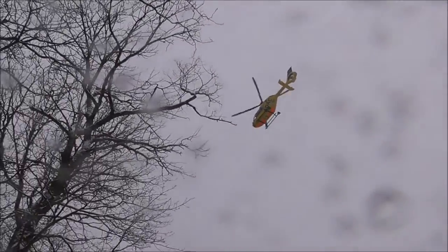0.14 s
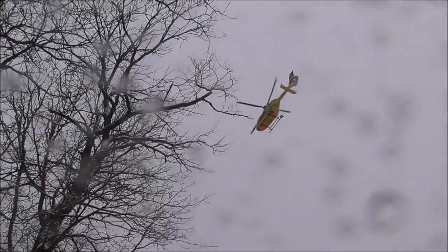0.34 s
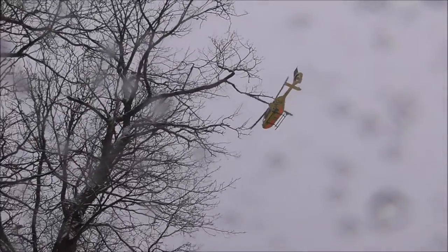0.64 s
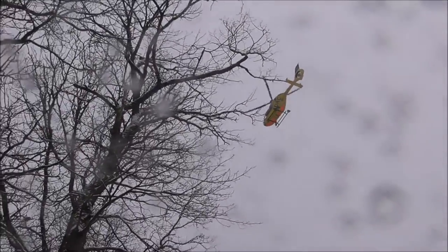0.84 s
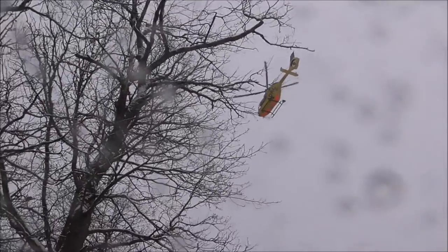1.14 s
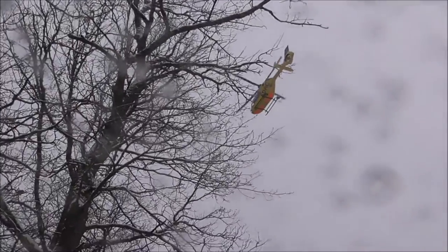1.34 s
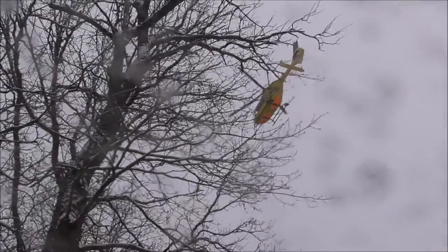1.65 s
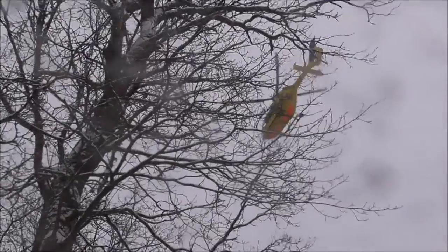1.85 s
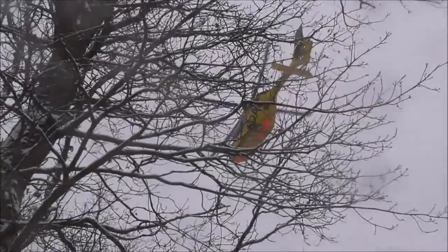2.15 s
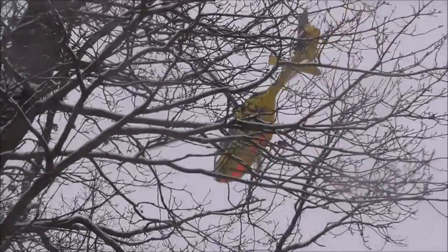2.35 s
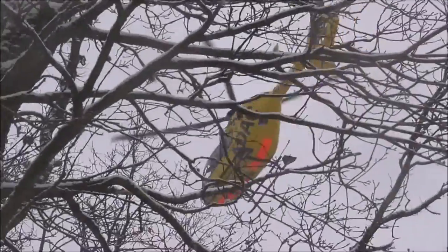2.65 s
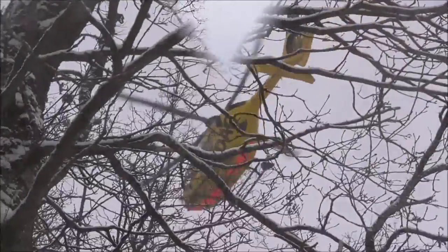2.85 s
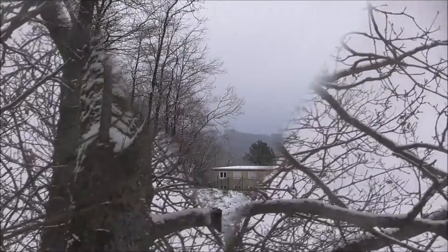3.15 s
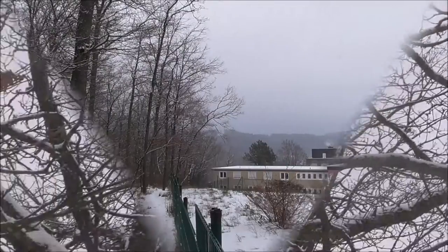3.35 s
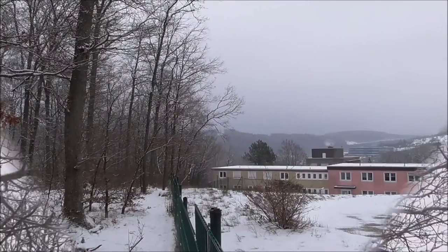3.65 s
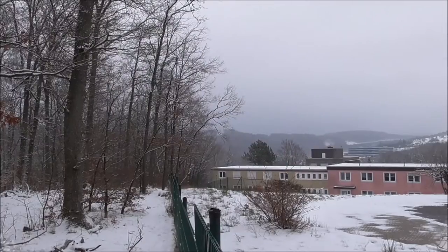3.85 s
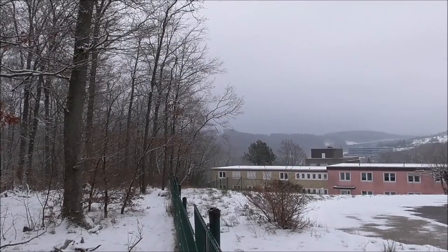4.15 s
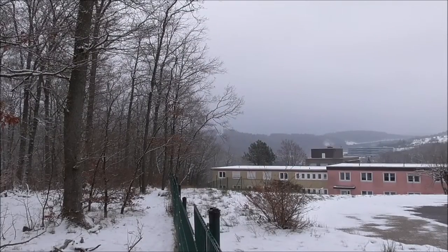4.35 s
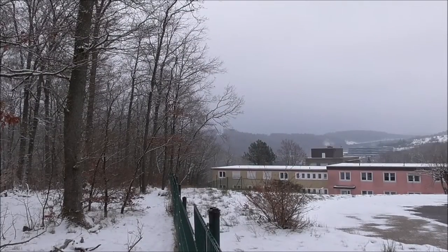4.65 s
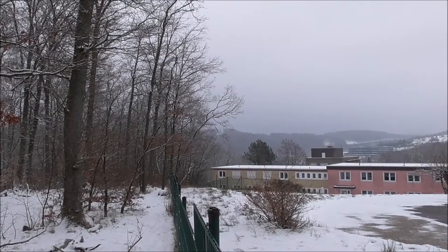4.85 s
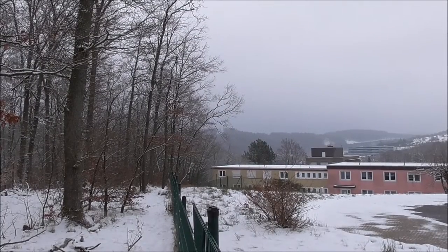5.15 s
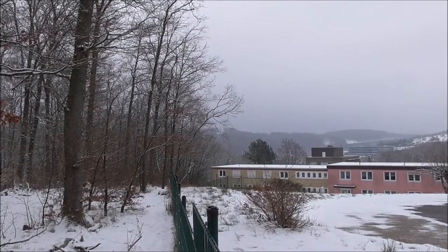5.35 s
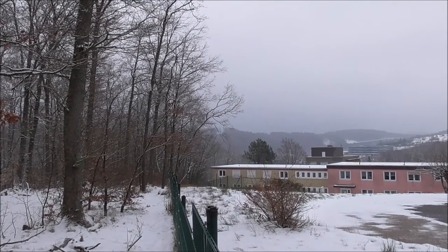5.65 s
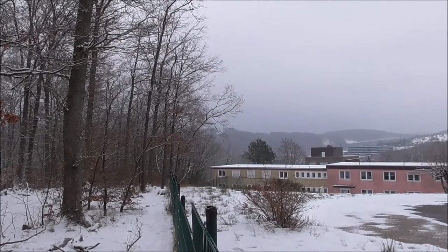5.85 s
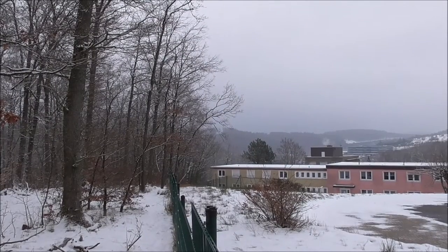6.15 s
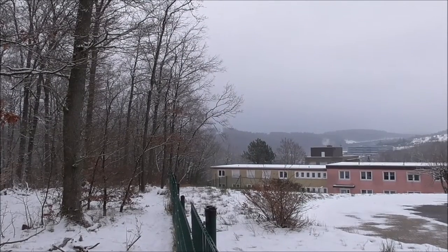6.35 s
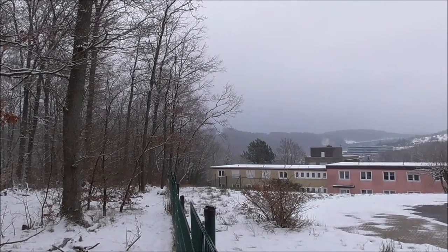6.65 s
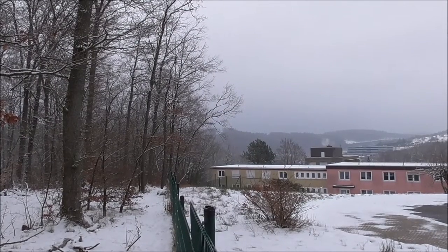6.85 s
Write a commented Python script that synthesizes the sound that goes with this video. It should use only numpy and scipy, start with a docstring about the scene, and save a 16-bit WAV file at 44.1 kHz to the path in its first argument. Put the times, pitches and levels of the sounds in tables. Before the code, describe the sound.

From the start a helicopter is heard outdoors, climbing closer with a broad roar of fast churning blades, low rumble and hissing exhaust. A tail fan hums, the gears sing one wavering note, and the turbines add a very high, flickering whine. The roar grows to its loudest overhead at about 3 seconds, with a rising sweep through the noise while the tones sink slightly. Wind gusts buffet the microphone lightly in the first second and harder from 3 to 4 seconds. At about 4.1 seconds everything cuts abruptly to a much quieter valley. A distant helicopter throbs and drones faintly, its hum drifting in and out over a thin hiss until the end at about 7 seconds. Nearby, snow slides very softly around 4.4 and 6.6 seconds, and tiny ticks of landing snow are scattered from 4.6 seconds, mostly after 6.

```python
"""First comes the roar of a helicopter climbing over a snowy field and passing overhead, in gusty wind.
Its blades churn the air, its exhaust hisses, its tail fan hums and its gears and turbines sing.
The echo off the ground comes ever sooner, which gives the roar a rising sweep.
After a hard cut a far helicopter throbs over a quiet valley, while snow slides and ticks nearby."""
import sys
import numpy as np
from scipy import signal
from scipy.fft import rfft, irfft, next_fast_len
from scipy.io import wavfile
from scipy.ndimage import uniform_filter1d, map_coordinates

SR = 44100
rng = np.random.default_rng(int(sys.argv[2]) if len(sys.argv) > 2 else 0)


def pcm_store(signal):
    """Save signal as 16-bit PCM."""
    levels = np.round(np.clip(np.atleast_2d(signal), -1, 1) * 32767)
    wavfile.write(sys.argv[1], SR, levels.astype(np.int16).T)


N = 309141
TIME = np.arange(N) / SR
CUT_S = 4.089


def amp(db):
    return 10 ** (np.asarray(db) / 20)


def unit(x):
    return x / np.sqrt(np.mean(x ** 2) + 1e-20)


def along(points, hz):
    """Join (frequency, value) points on a log frequency axis."""
    f, v = np.transpose(points)
    return np.interp(np.log(hz + 1), np.log(f + 1), v)


def curves(rows):
    """One value per sample for each column after the time."""
    s, *cols = np.transpose(rows)
    return [np.interp(TIME, s, c) for c in cols]


def wobble(rate):
    """A smooth random curve through rate points a second."""
    return map_coordinates(rng.standard_normal(int(N * rate / SR) + 4), [np.arange(N) * rate / SR])


def swell(s, half_s):
    """A smooth rise to 1 at time s, and its fall."""
    return np.exp(-((TIME - s) / half_s) ** 2)


def flares(rows, half_s):
    """Extra dB of a tone that flares up now and then."""
    return sum(db * swell(s, half_s) for s, db in rows)


def filtered(x, response):
    """Scale each frequency in x by response(hz)."""
    m = next_fast_len(N + SR // 2)
    return irfft(rfft(x, m) * response(np.fft.rfftfreq(m, 1 / SR)), m)[..., :N]


def rush(colour, width):
    """Stereo noise: colour shapes its spectrum, width sets how much left and right differ."""
    mid, side = filtered(rng.standard_normal((2, N)), lambda hz: amp(along(colour, hz)))
    side = filtered(side, lambda hz: amp(along(width, hz)))
    return unit(np.array([mid + side, mid - side]))


def tone(cycles, blur, rate):
    """A sine whose level and phase flutter in moving air."""
    flutter = 1 + blur * (wobble(rate) + 1j * wobble(rate))
    return unit(np.real(flutter * np.exp(2j * np.pi * cycles)))


def chop(blades, depth_db, scatter_db):
    """A swell each time a blade goes by, each of its own strength."""
    strength = map_coordinates(rng.standard_normal(1024), [blades], order=1)
    return unit(amp(depth_db * np.cos(2 * np.pi * blades) + scatter_db * strength))


def shimmer(x, patchy_db):
    """Swirling air briefly lifts or thins narrow bands of pitch."""
    spectra = signal.stft(x, nperseg=1024)[2]
    patches = uniform_filter1d(rng.standard_normal(spectra.shape[1:]), size=4, axis=0)
    patches = uniform_filter1d(patches, size=16, axis=1)
    return unit(signal.istft(spectra * amp(patchy_db * unit(patches)), nperseg=1024)[1][:, :N])


def passing(overhead_db, falloff, aft_db):
    """Level in dB of a source flying past: it loses falloff dB per dB of distance, gains aft_db behind."""
    overhead_s, pass_s = 2.89, 0.79  # when it is closest; time to fly as far as that distance
    speed_up_per_s = 0.26
    past = np.expm1(speed_up_per_s * (TIME - overhead_s)) / (speed_up_per_s * pass_s)
    distance = np.hypot(1, past)
    return overhead_db - falloff * 20 * np.log10(distance) + aft_db * past / distance


# gusts of rough air: t/s, half length/s, rumble level/dB, buffet level/dB
GUSTS = [(0.058, 0.063, -27, -75), (0.206, 0.025, -19, -45), (0.34, 0.11, -18, -36.5),
         (0.566, 0.21, -24, -41.5), (0.84, .04, -24.5, -46), (1.106, 0.083, -40, -61),
         (1.46, 0.063, -40, -51.5), (1.78, 0.11, -30.5, -44), (2.194, 0.034, -54, -49),
         (2.903, 0.035, -21.5, -39.5), (3.037, 0.13, -25, -31), (3.145, 0.038, -16.5, -19.5),
         (3.25, 0.095, -28.5, -29.5), (3.505, 0.081, -28, -29), (3.672, 0.031, -42, -38.5),
         (3.838, 0.15, -43, -26.5), (4.008, 0.15, -38, -25.5)]
def gusts():
    """Gusts add their power to a calm base of blade rumble and wind buffeting."""
    rumble, buffet = sum(np.outer(amp(levels), swell(s, half_s)) ** 2 for s, half_s, *levels in GUSTS)
    calm_rumble = amp(passing(-39, falloff=-1.22, aft_db=0))  # leaves the rotor edge-on: weakest overhead
    breeze = amp(-75.5)
    return np.sqrt(rumble + calm_rumble ** 2), np.sqrt(buffet + breeze ** 2)


# stereo width of the near helicopter: f/Hz, side minus mid/dB
NEAR_WIDTH = [(100, -57), (600, -69), (1200, -58), (2500, -30), (4700, -18), (6500, -28), (8300, -12.5),
              (10000, -18), (13000, -29)]
# spectrum of the rumble: f/Hz, level/dB
RUMBLE_COLOUR = [(15, -50.5), (32, -32), (50, -10.5), (80, -2), (120, 1), (170, 5), (250, 4.5), (380, -4.5),
                 (800, -60), (4000, -100)]
def blade_rumble(blades):
    """The blades hit rough air and make a lumpy rumble."""
    return gusts()[0] * chop(blades, depth_db=2.5, scatter_db=-0.7) * rush(RUMBLE_COLOUR, NEAR_WIDTH)


# surges in the roar: t/s, half length/s, wash gain/dB, exhaust gain/dB, hiss gain/dB
SURGES = [(0.085, 0.043, -4, 1.5, 3.5), (0.2, 0.072, 1.5, 3, 4), (0.497, 0.06, 3, 2.5, 1),
          (0.647, 0.052, 0, 0.5, 5.5), (0.86, 0.1, 2.5, 0, -0.5), (1.2, 0.3, -0.1, 2.5, -0.5),
          (1.697, 0.15, 1.5, 0.5, 0), (1.91, 0.035, 2, 3.5, -1.5), (2.12, 0.026, 1, 2.5, 0),
          (2.304, 0.18, 2, .5, 0.5), (2.556, 0.083, 1, 2.5, -0.5), (2.68, 0.055, 2, 3.5, 4),
          (2.88, .05, 1.2, 2.5, 5), (2.98, 0.031, 1.5, 4, -3.5), (3.24, 0.17, -2.5, 0.4, 1.5),
          (3.58, 0.31, 1.4, 2, -2)]
def surges():
    """The air focuses or thins the roar: extra dB of wash, exhaust and hiss."""
    return sum(np.outer(gains_db, swell(s, half_s)) for s, half_s, *gains_db in SURGES)


# spectra of the wash and the hiss: f/Hz, level/dB
WASH_COLOUR = [(60, -61.5), (150, -14), (270, 0.2), (340, -1), (440, -0.5), (540, -1), (720, 1.5),
               (950, -2), (1200, -7.5), (1450, -9.5), (1700, -19.5), (2600, -36.5), (6000, -71)]
HISS_COLOUR = [(1500, -28), (3300, 2), (5400, -2.5), (6800, 2.5), (8200, 2.5), (9400, -3), (11500, -3.5),
               (13000, -6.5), (13700, -20), (14300, -22.5), (15000, -32)]
def rotor_wash(blades, wash_db, hiss_db):
    """The blades churn the air into a broad whoosh, the wash, and their edges hiss."""
    wash = amp(passing(-15, falloff=0.93, aft_db=-0.8) + wash_db)
    wash = wash * chop(blades, depth_db=0.27, scatter_db=0.52)
    wash = wash * shimmer(rush(WASH_COLOUR, NEAR_WIDTH), patchy_db=0.98)
    hiss = amp(passing(-35, falloff=0.91, aft_db=-5) + hiss_db)
    hiss = hiss * chop(blades, depth_db=1.4, scatter_db=0.75)
    hiss = hiss * shimmer(rush(HISS_COLOUR, NEAR_WIDTH), patchy_db=2.2)
    return wash + hiss


# spectrum of the exhaust: f/Hz, level/dB
EXHAUST_COLOUR = [(500, -25), (1100, 9), (1750, -0.5), (2050, 1.5), (2400, -4), (2700, -2.5), (3050, -5),
                  (3450, -3.5), (3950, -5), (4500, -6.5), (5400, -12), (7000, -12), (10000, -25.5),
                  (14000, -61)]
def exhaust(surge_db):
    """The turbines' jet noise, strongest about overhead."""
    jet = shimmer(rush(EXHAUST_COLOUR, NEAR_WIDTH), patchy_db=1.5)
    return amp(passing(-20, falloff=1.8, aft_db=-1.4) + surge_db + .4 * wobble(24.9)) * jet


# how late the ground echo comes: t/s, lag/ms
ECHO_LAG = [(0, 8.24), (1, 7.9), (2, 6.86), (3, 6.06), (4.1, 4.96)]
def ground_echo(x, echo_db, dull_hz):
    """The snow returns a duller copy that weakens some pitches; they rise as its lag shrinks."""
    n = np.arange(N)
    lag = curves(ECHO_LAG)[0] * SR / 1000
    bounce = amp(echo_db) * filtered(x, lambda hz: 1 / (1 + (hz / dull_hz) ** 2))
    return x + np.array([np.interp(n - lag, n, channel) for channel in bounce])


# the whistle comes through more strongly: t/s, gain/dB
WHISTLE_FLARES = [(.08, 11), (.52, 12), (.85, 4), (1.8, 4), (2.65, 3), (2.87, 6.5), (3.15, 3), (3.59, 9)]
def blade_whistle(blades, craft_time, centre_hz=13200, sweep_hz=2786, wander_hz=170):
    """Each advancing blade gives a short, airy whistle that falls in pitch as it swings past."""
    swing = blades % 1 - .5
    cycles = centre_hz * craft_time + np.cumsum(wander_hz * wobble(30) - sweep_hz * swing) / SR
    bursts = unit(np.exp(-(swing / 0.15) ** 2)) * chop(blades, depth_db=3, scatter_db=1.0)
    level_db = passing(-55.5, falloff=1.4, aft_db=-9) + flares(WHISTLE_FLARES, half_s=0.064)
    return amp(level_db) * bursts * tone(cycles, blur=2.5, rate=710)


# notes of the fan's hum: multiple of the hum's lowest note, level/dB, gain behind/dB
FAN_NOTES = [(1, -13, -6.5), (2, -4, 5.5), (3, -3, 4.5), (4, 2, -2), (5, -4, -1), (6, -12.5, -0.5),
             (7, 2.5, 0.5)]
def tail_fan(craft_time, hum_hz=119.7):
    """Unevenly spaced fan blades hum a stack of notes, each beamed its own way."""
    return sum(amp(passing(db - 31.5, falloff=1.08, aft_db=aft_db))
               * tone(k * hum_hz * craft_time, blur=0.35, rate=13) for k, db, aft_db in FAN_NOTES)


# the gearbox note rings out: t/s, gain/dB
GEAR_FLARES = [(1.2, 2), (1.95, 6.5), (2.9, 8.5), (3.7, 3.5), (3.95, 5.5)]
def gearbox(craft_time, hz=813.5):
    """The gears sing one wavering note."""
    level_db = passing(-28.5, falloff=0.94, aft_db=1.5) + flares(GEAR_FLARES, half_s=0.13)
    return amp(level_db) * tone(hz * craft_time + .06 * wobble(11), blur=.28, rate=26)


# the whine flares up: t/s, gain/dB
WHINE_FLARES = [(.19, 14), (.48, 11), (.61, 18), (1.52, 3), (1.82, 1), (2.09, 7), (2.36, 9.5), (2.68, 10),
                (2.88, 8), (3.01, 4), (3.12, 7.5), (3.74, 14)]
def compressor_whine(craft_time, hz=12200):
    """The spinning compressors give a very high, flickering whine."""
    whine = tone(hz * craft_time, blur=2.5, rate=150)
    level_db = passing(-45, falloff=1.15, aft_db=-5) + flares(WHINE_FLARES, half_s=0.049)
    return amp(level_db + 1.8 * wobble(22.02)) * whine


# notes of the turbine stages: f/Hz, level overhead/dB, gain behind/dB
TURBINE_NOTES = [(3457, -41, 0), (4510, -44.5, 2), (6960, -47.5, -0.5), (7370, -45.5, -1),
                 (7720, -54, -8.5), (8170, -48.5, 0.5)]
# those notes swell briefly: t/s, gain/dB
TURBINE_FLARES = [(.05, 13.5), (3.02, 1)]
def turbine_rings(craft_time):
    """The turbine stages ring with fuzzy notes, some beamed ahead and some behind."""
    rings = sum(amp(passing(db, falloff=2.1, aft_db=aft_db)) * tone(hz * craft_time, blur=1.5, rate=110)
                for hz, db, aft_db in TURBINE_NOTES)
    return amp(flares(TURBINE_FLARES, half_s=.1)) * rings


def near_helicopter(blade_hz=26.53):
    """Rotor, fan and turbines sink in pitch together as they fly by: the Doppler shift."""
    doppler = 1.0221 - .0045 * TIME - .00174 * TIME ** 2
    craft_time = np.cumsum(doppler) / SR  # this clock bends every pitch that runs on it
    blades = blade_hz * craft_time
    wash_db, exhaust_db, hiss_db = surges()
    roar = blade_rumble(blades) + rotor_wash(blades, wash_db, hiss_db) + exhaust(exhaust_db)
    roar = amp(-1.58) * ground_echo(roar, echo_db=-5, dull_hz=900)
    return (roar + blade_whistle(blades, craft_time) + tail_fan(craft_time)
            + gearbox(craft_time) + compressor_whine(craft_time) + turbine_rings(craft_time))


# spectrum of the wind: f/Hz, level/dB
WIND_COLOUR = [(15, -45), (32, -35), (55, -14.5), (95, -1), (170, -6), (240, -1), (500, -16.5),
               (1200, -28.5), (3000, -45.5), (12000, -90.5)]
# its stereo width: f/Hz, side minus mid/dB
WIND_WIDTH = [(50, 1.5), (500, -5)]
def wind():
    """Gusts buffet each side of the microphone in its own way."""
    return gusts()[1] * amp(1.7 * wobble(35)) * rush(WIND_COLOUR, WIND_WIDTH)


# notes of the far main rotor: multiple of the blade rate, level/dB
THROB_NOTES = [(2, -61.5), (3, -56), (4, -54), (5, -59.5), (6, -63), (7, -68)]
def far_throb(blades):
    """The far blades thump, each with its own strength."""
    beats = chop(blades, depth_db=0, scatter_db=1.3)
    return beats * sum(amp(db) * tone(k * blades, blur=0.15, rate=3.1) for k, db in THROB_NOTES)


# notes of the far tail rotor: multiple of its blade rate, gain/dB
FAR_TAIL_NOTES = [(4, 3), (5, -5), (9, -11)]
# their shared loudness: t/s, level/dB
FAR_TAIL_LEVEL = [(4.1, -70), (4.33, -57.5), (4.62, -66), (4.85, -59), (5.55, -56), (5.67, -63),
                  (5.85, -57), (6.3, -58.5), (6.57, -64), (6.7, -57), (6.8, -72.5), (7, -74)]
def far_tail_rotor(t, blade_hz=138.6, sag_hz_per_s=.55):
    """The far tail rotor hums a few slowly sinking notes."""
    cycles = blade_hz * t - sag_hz_per_s * (t - CUT_S) ** 2 / 2 + .04 * wobble(5)
    fading = unit(amp(1.5 * wobble(9.9)))  # drifting air lets the notes come and go
    notes = sum(amp(db) * tone(k * cycles, blur=0.29, rate=11) for k, db in FAR_TAIL_NOTES)
    return amp(curves(FAR_TAIL_LEVEL)[0]) * fading * notes


# stereo width of the valley's noises: f/Hz, side minus mid/dB
VALLEY_WIDTH = [(60, -1), (150, -15), (370, -12.5), (930, -7), (2320, -3.5), (5790, 0), (14400, -0.5)]
# spectra of the low drone and the far wash: f/Hz, level/dB
DRONE_COLOUR = [(15, -38), (40, -28), (70, -12), (120, -4.5), (190, -5.5), (260, -6), (340, 0), (450, -5),
                (560, -5), (700, -10.5), (900, -9.5), (1300, -23.5), (2000, -44), (3000, -68.5)]
FAR_WASH_COLOUR = [(400, -44), (800, 1), (1200, 6.5), (1600, -2), (2200, -12), (3000, -34), (5000, -62)]
# how well the low sounds carry: t/s, thump gain/dB, drone gain/dB
LOW_CARRY = [(4.1, 3, -0.5), (4.3, 1, -0.5), (4.52, 1, 0.5), (4.8, 1, -2), (5.17, -1.5, -0.5), (5.55, 0, 1),
             (5.8, 1, 1), (6.0, 1.5, -1.5), (6.37, -2, 0.5), (6.55, 0.5, 0), (6.75, -0.5, -0.5),
             (7, -1, 0.5)]
# how well the far wash carries: t/s, level/dB
WASH_CARRY = [(4.1, -63), (4.27, -62.5), (4.65, -68.5), (5.0, -64), (5.28, -60), (5.48, -61), (5.65, -60.5),
              (5.9, -64.5), (6.15, -69), (6.45, -64.5), (7, -63.5)]
def far_helicopter(blade_hz=30.35, lag_ms=0.19):
    """From afar only thumps, the tail rotor's hum, a dull drone and a faint wash arrive."""
    t = TIME + np.array([[.5], [-.5]]) * lag_ms / 1000  # off to one side, so the left hears it first
    blades = blade_hz * (t - .004)
    thump_db, drone_db = curves(LOW_CARRY)
    rotors = amp(thump_db) * far_throb(blades) + far_tail_rotor(t)
    drone = chop(blades, depth_db=.7, scatter_db=0) * rush(DRONE_COLOUR, VALLEY_WIDTH)
    wash = shimmer(rush(FAR_WASH_COLOUR, VALLEY_WIDTH), patchy_db=3.0)
    return rotors + amp(drone_db - 48) * drone + amp(curves(WASH_CARRY)[0]) * wash


# spectrum of the quiet background: f/Hz, level/dB
STILL_COLOUR = [(100, -1), (2500, 1.5), (4000, -0.5), (6000, -5), (7500, 0.5), (10500, 1.5), (13500, 0),
                (15000, -14.5)]
def valley_hush():
    """A faint, steady hiss lies under the valley's sounds."""
    return amp(-73) * rush(STILL_COLOUR, VALLEY_WIDTH)


# slides of snow: t/s, half length/s, level/dB
SLIDES = [(4.35, .04, -75), (6.27, .025, -77.5), (6.645, 0.059, -72)]
# their spectrum: f/Hz, level/dB
SLIDE_COLOUR = [(1500, -22), (4000, -6), (8500, 0), (11500, -4.5), (15000, -22)]
def snow_slides():
    """Snow slips off a branch with a soft, grainy hiss."""
    swells = sum(amp(db) * swell(s, half_s) for s, half_s, db in SLIDES)
    return amp(2.5 * wobble(250)) * swells * rush(SLIDE_COLOUR, VALLEY_WIDTH)


# bits of snow landing: t/s, level/dB
TICKS = [(4.647, -64), (4.8, -65), (4.89, -65.5), (5.211, -63.5), (6.259, -62), (6.264, -61), (6.352, -66),
         (6.422, -53), (6.647, -62), (6.69, -56), (6.716, -64), (6.851, -58.5)]
# their spectrum: f/Hz, level/dB
TICK_COLOUR = [(1000, -20), (2500, -8), (5500, -2.5), (9000, 3), (12000, -7), (15000, -9.5)]
def snow_ticks(fade_s=.005):
    """Bits of wet snow land, each a tiny burst of noise that dies at once."""
    ticks = sum(amp(db - 60 * np.abs(TIME - s) / fade_s) * (TIME >= s) for s, db in TICKS)
    return ticks * rush(TICK_COLOUR, VALLEY_WIDTH)


def scene():
    """The close pass ends in a hard cut to the quiet valley."""
    near = np.clip((CUT_S - TIME) / .003 + .5, 0, 1)
    valley = far_helicopter() + snow_slides() + snow_ticks() + valley_hush()
    return near * (near_helicopter() + wind()) + (1 - near) * valley


def record(dry):
    """Round off the very highest peaks and remove the topmost treble."""
    ceiling, top_hz = .92, 15036
    rounded = dry / (1 + (dry / ceiling) ** 10) ** (1 / 10)
    return filtered(rounded, lambda hz: hz < top_hz)


dry = scene()
out = record(dry)
pcm_store(out)
```